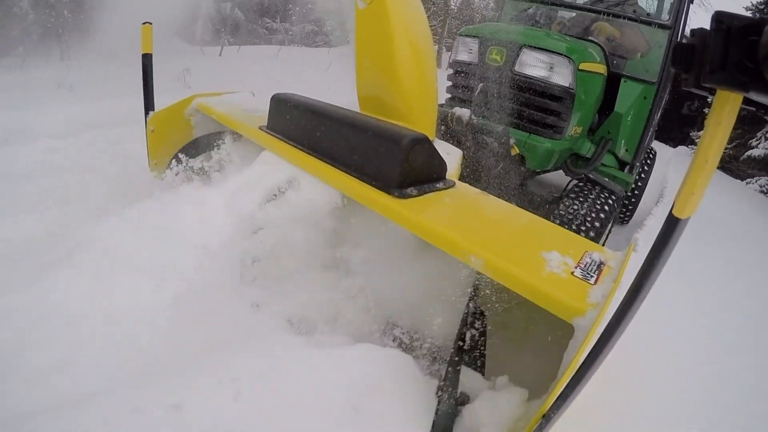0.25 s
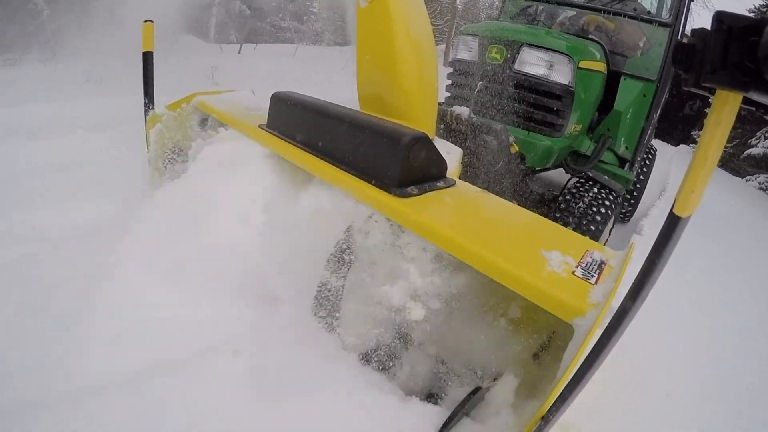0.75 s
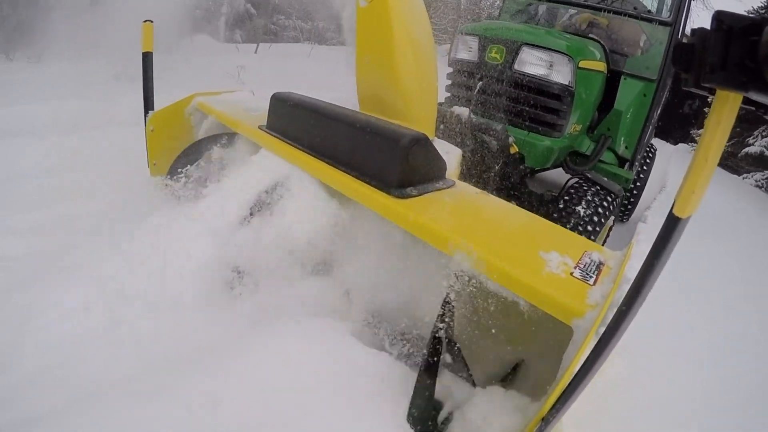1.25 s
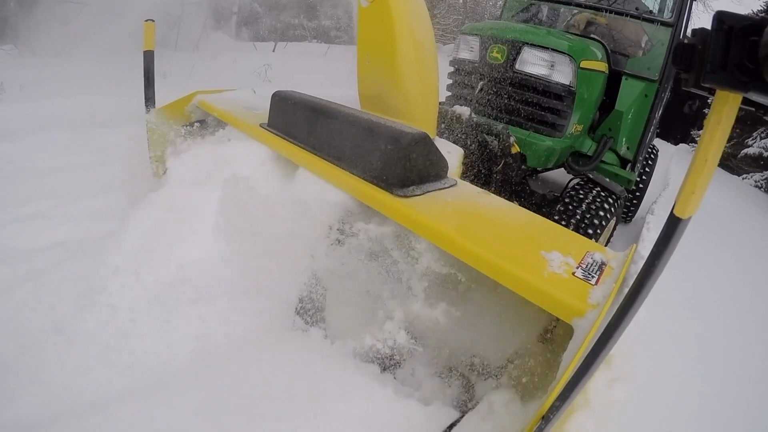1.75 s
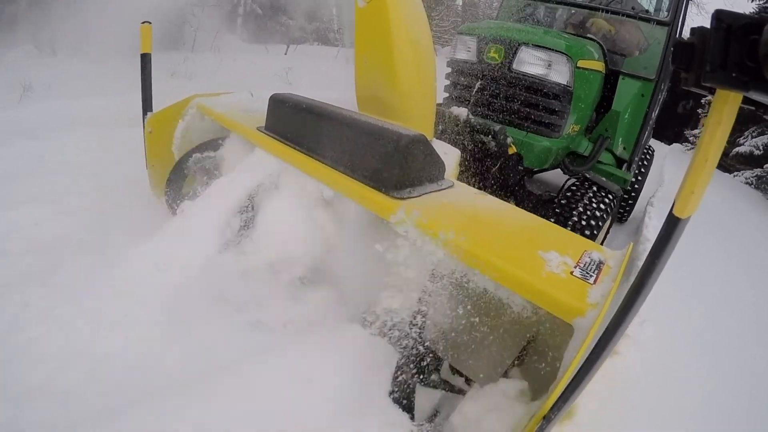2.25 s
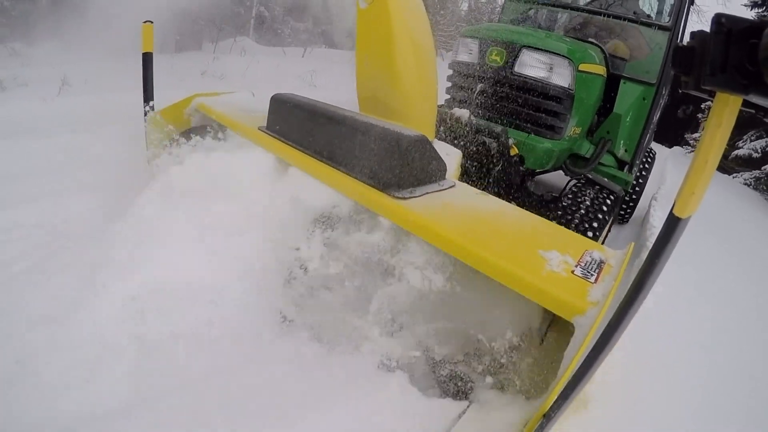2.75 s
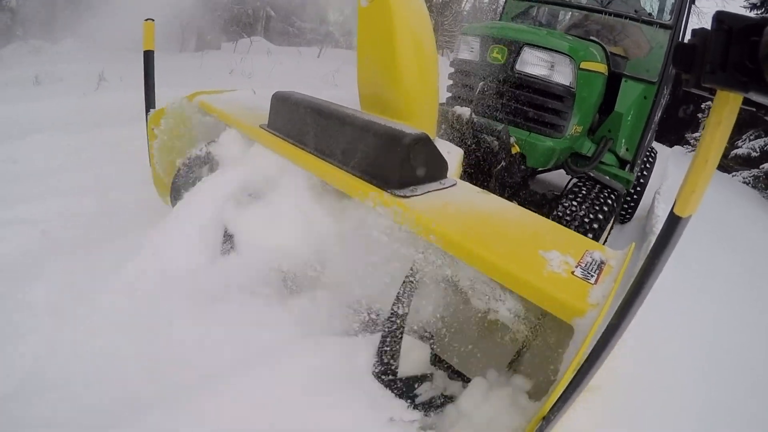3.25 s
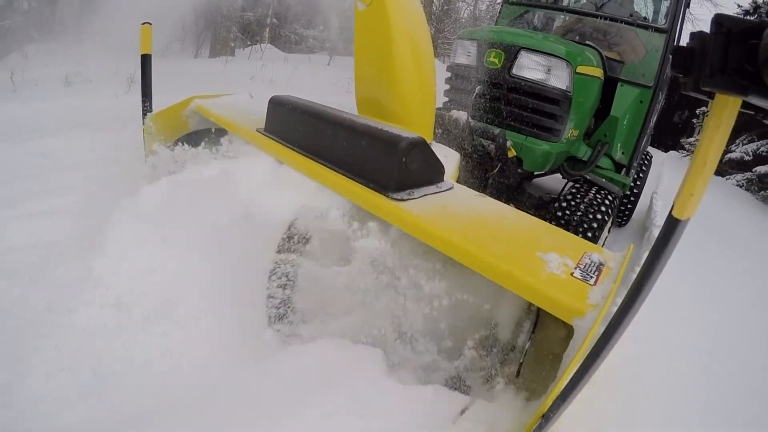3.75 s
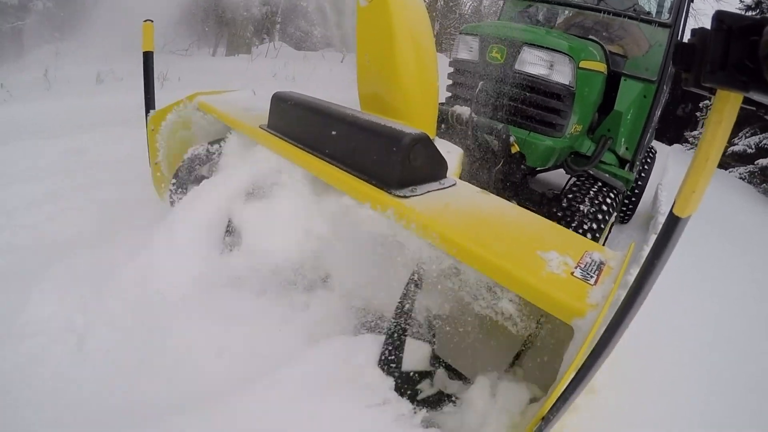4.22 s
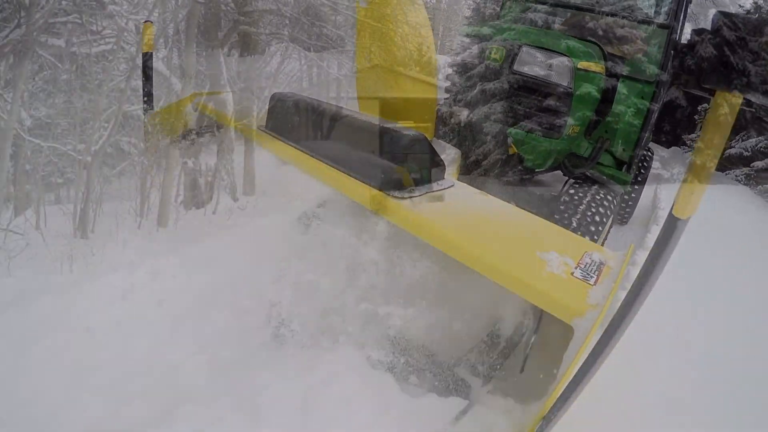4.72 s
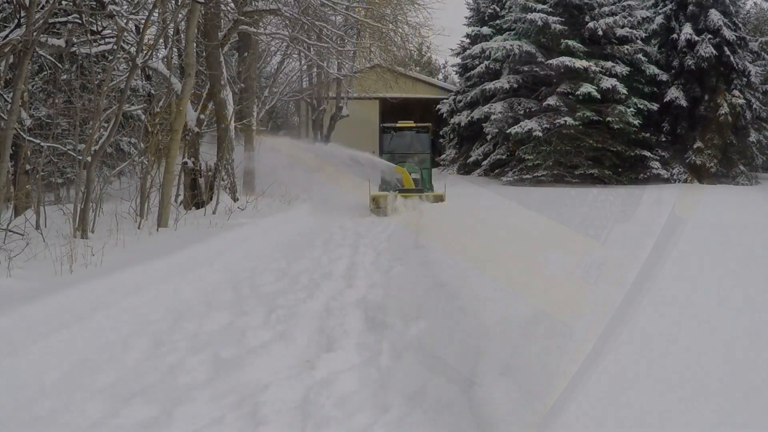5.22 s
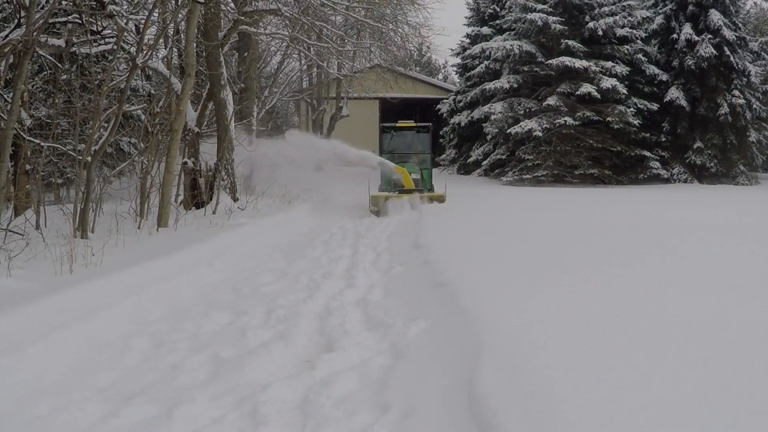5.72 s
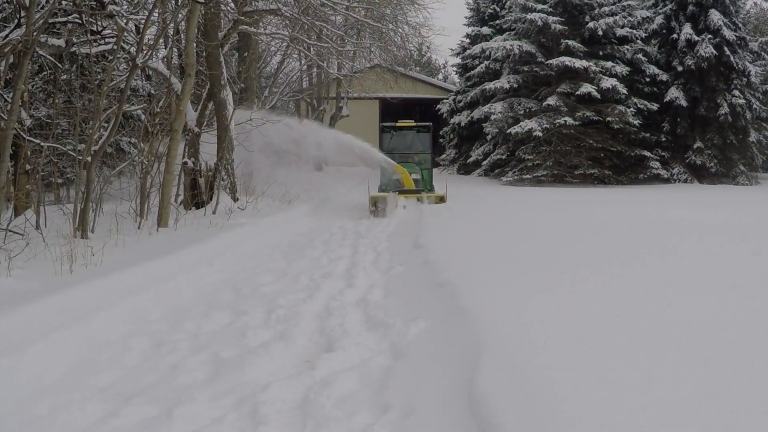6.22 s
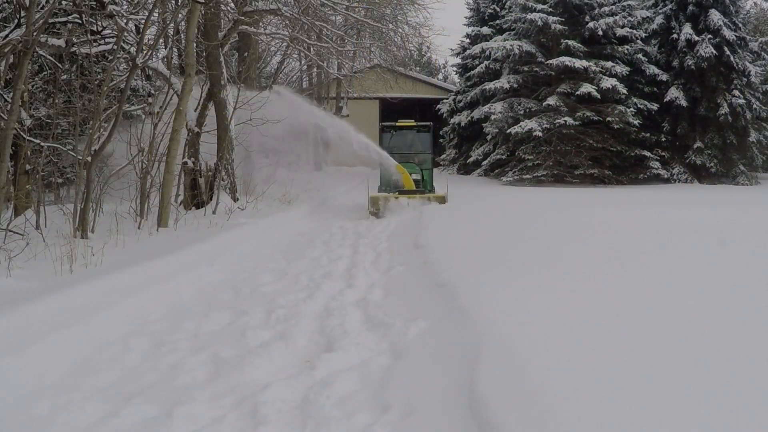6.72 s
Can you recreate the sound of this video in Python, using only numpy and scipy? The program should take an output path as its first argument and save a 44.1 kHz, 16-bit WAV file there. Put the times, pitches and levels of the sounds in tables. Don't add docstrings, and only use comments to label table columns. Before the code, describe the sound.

A diesel tractor's snow blower throbs and whines loudly at close range, then fades into a distant dull drone with soft snow thuds.

```python
import sys
import numpy as np
from scipy import signal
from scipy.fft import rfft, irfft, next_fast_len
from scipy.io import wavfile
from scipy.ndimage import uniform_filter1d

SR = 44100
rng = np.random.default_rng(int(sys.argv[2]) if len(sys.argv) > 2 else 0)


def attenuation_scalar(level_db):
    decades = np.asarray(level_db, float) / 20
    return 10 ** decades


def unload_wav(signal):
    wavfile.write(
        sys.argv[1],
        SR,
        np.round(np.clip(np.atleast_2d(signal).T, -1, 1) * 32767).astype(np.int16),
    )


N = 307377
TIME_S = np.arange(N) / SR
TURN_RAD = 2 * np.pi
BLADES = 3
CYCLES_PER_SHAFT_TURN = 1.6734
FADE_START_S, FADE_S = 4.325, 0.97


def evened(x):
    return x / np.sqrt(np.mean(x ** 2) + 1e-20)


def drift(seconds):
    size = max(round(seconds * SR), 2)
    smooth = uniform_filter1d(rng.standard_normal(N), size)
    return evened(uniform_filter1d(smooth, size))


def shaft_angle(run, order, pulse_s):
    run_s, whine_hz = np.transpose(run)
    shaft_hz = np.interp(TIME_S, run_s, whine_hz) / order
    angle = TURN_RAD * np.cumsum(shaft_hz) / SR
    return angle - angle[round(pulse_s * SR)]


def far_share():
    return np.clip((TIME_S - FADE_START_S) / FADE_S, 0, 1)


def thump(shaft, harmonics, swells, auger):
    bite_s, auger_hz, slip_rad, snap_s = auger
    turn = (TIME_S - bite_s) * auger_hz
    size = round(snap_s * SR)
    out = np.zeros(N)
    for (k, db, rad, snap_turn), (once, twice, peak_turn) in zip(harmonics, swells):
        lag = slip_rad * (0.5 - (turn - snap_turn) % 1)
        from_peak = TURN_RAD * (turn - peak_turn)
        swell = 1 + once * np.cos(from_peak) + twice * np.cos(2 * from_peak)
        slide = uniform_filter1d(np.cos(k * lag), size) + 1j * uniform_filter1d(np.sin(k * lag), size)
        carrier = np.exp(1j * (BLADES * k * shaft + rad))
        out += np.sqrt(2) * attenuation_scalar(db) * swell * (slide * carrier).real
    return out


def bite_of_blades(shaft, uneven_db):
    blade = np.floor(BLADES * shaft / TURN_RAD + 0.5).astype(int)
    size_db = uneven_db * rng.standard_normal(1000)[blade % 1000]
    return attenuation_scalar(uniform_filter1d(size_db, size=250))


# (time [s], level [dB], dying time [s])
WADS = [
    (5.0, -21, .02),
    (5.325, -21, .012),
    (5.62, -17, 0.012),
    (5.915, -18, 0.084),
    (6.272, -18, .012),
    (6.57, -15, 0.07),
    (6.865, -20, 0.011),
    (6.925, -18, .012),
]


def wads(shaft, rise_s, sharp):
    load = np.zeros(N)
    for s, db, fall_s in WADS:
        from_wad_s = TIME_S - s
        load += attenuation_scalar(db) * np.exp(np.where(from_wad_s < 0, from_wad_s / rise_s, -from_wad_s / fall_s))
    half_blade = BLADES * shaft / 2 - 0.35
    u = sharp * np.sin(half_blade)
    pulses = -2.3 * load * u * np.sign(np.cos(half_blade)) * np.exp(-u ** 2)
    chute = signal.butter(2, [75, 175], "band", fs=SR, output="sos")
    return signal.sosfiltfilt(chute, pulses)


def orders(shaft, table, waver_db, lag_rad=0):
    out = np.zeros(N)
    for k, db in table:
        out += np.sqrt(2) * attenuation_scalar(db + waver_db * drift(0.12)) * np.cos(k * shaft - lag_rad)
    return out


def gear(shaft, auger):
    bite_s, auger_hz = auger[:2]
    twist_rad = 0.82 * np.sin(TURN_RAD * auger_hz * (TIME_S - bite_s))
    return orders(shaft + twist_rad / 40, [(40, -24)], waver_db=1.0)


def engine(shaft, table, waver_db, lead_rad=0):
    return orders(CYCLES_PER_SHAFT_TURN * shaft - lead_rad, table, waver_db)


def whines(table):
    out = np.zeros(N)
    for hz, width_hz, db in table:
        level = np.sqrt(2) * attenuation_scalar(db + 2.7 * drift(0.058))
        turns = np.cumsum(hz + width_hz * drift(0.0591)) / SR
        out += level * np.cos(TURN_RAD * turns)
    return out


def roar(shaft, spectrum, panels, dead, knock, slap, patchy_db):
    firing_turn = 3 * CYCLES_PER_SHAFT_TURN * shaft / TURN_RAD % 1
    blade_turn = BLADES * shaft / TURN_RAD % 1
    firing = np.exp(-firing_turn / 0.22) * attenuation_scalar(3.0 * drift(0.013))
    blades = np.exp(-blade_turn / 0.25) * attenuation_scalar(2.5 * drift(0.028))
    drive = rng.standard_normal(N) * (1 + knock * firing + slap * blades)
    drive *= 1 + 0.037 * np.cos(TURN_RAD * 12 * TIME_S)

    z = signal.stft(drive, nperseg=512, noverlap=384)[2]
    patches = uniform_filter1d(rng.standard_normal(z.shape), size=5, axis=0)
    patches = evened(uniform_filter1d(patches, size=7, axis=1))
    drive = signal.istft(z * attenuation_scalar(patchy_db * patches), nperseg=512, noverlap=384)[1][:N]

    size = next_fast_len(N)
    hz = np.fft.rfftfreq(size, 1 / SR) + 1
    at_hz, db = np.transpose(spectrum)
    power = attenuation_scalar(np.interp(np.log(hz), np.log(at_hz), db, left=-40)) ** 2
    for f, width_hz, panel_db in panels:
        power += attenuation_scalar(panel_db) ** 2 / (1 + (2 * (hz - f) / width_hz) ** 4)
    for f, width_hz, depth in dead:
        power *= 1 - min(depth, 0.95) / (1 + (2 * (hz - f) / width_hz) ** 2)
    return evened(irfft(rfft(drive, size) * np.sqrt(power), size)[:N])


# (time [s], gear whine = 40 x shaft [Hz])
NEAR_SPEED = [(0.0, 668.3), (1.09, 663.1), (2.06, 664.6), (2.14, 664.3), (5.15, 669.1)]
# (harmonic, level [dB], lag [rad], snap [turns])
NEAR_BLADES = [(1, -16.5, -0.42, -0.22), (2, -22, -0.72, 0.086), (3, -31, -1.6, 0.088)]
NEAR_SWELLS = [(0.37, 0.1, 0.062), (0.27, 0.37, 0.54), (0.06, 0.16, 0.58)]
# (bite time [s], speed [turns/s], blade slip [rad/turn], snap-back time [s])
NEAR_BITE = (0.303, 3.1, 1.52, 0.053)
# (order, level [dB])
NEAR_SHAFT = [(2, -36), (4, -40), (12, -34), (15, -30), (18, -31.5), (20, -38.5), (21, -32), (24, -35),
              (27, -37), (30, -37.5), (33, -38.5), (36, -40.5)]
# (order, level [dB])
NEAR_CYCLE = [(1, -47), (2, -35), (3, -24), (6, -35.5), (9, -35), (12, -50), (27, -34.5)]
# (frequency [Hz], width [Hz], level
# [dB])
NEAR_TONES = [(700.5, 2, -29), (775, 10, -35), (530, 15, -35), (1329, 6, -42)]
# (frequency [Hz], density [dB/Hz])
NEAR_NOISE = [(22, -10), (70, 1.5), (480, -3.5), (780, -4), (1050, -14), (1400, -8), (1850, -20.5),
              (3000, -14), (3400, -20.5), (5400, -26.5), (7000, -40.5), (9000, -46.5), (13800, -44),
              (15300, -49)]
# (frequency [Hz], width [Hz], density [dB/Hz])
NEAR_STEEL = [(634, 200, -3.5), (945, 105, -3.5), (1181, 78, 0.5), (1683, 89, -15.5), (2059, 98, -3.5),
              (2389, 157, -2), (2572, 200, -10), (2860, 190, -23), (3050, 100, -15), (3750, 21, -21),
              (3890, 46, -20.5), (4674, 290, -23), (5766, 200, -24.5)]
# (frequency [Hz], width [Hz], depth [0-1])
NEAR_GAPS = [(827, 45, 0.4), (1040, 64, 0.55), (1436, 30, 1), (2146, 59, 0.07), (2690, 70, 0.4),
             (2960, 55, .5), (3150, 91, 0.9)]


def near():
    shaft = shaft_angle(NEAR_SPEED, order=40, pulse_s=2.591)
    blower = thump(shaft, NEAR_BLADES, NEAR_SWELLS, NEAR_BITE) * bite_of_blades(shaft, uneven_db=1.5)
    steady = orders(shaft + 0.075, NEAR_SHAFT, waver_db=0.5, lag_rad=1.9)
    blower += steady * bite_of_blades(shaft, uneven_db=2.8)
    motor = engine(shaft, NEAR_CYCLE, waver_db=3.0, lead_rad=0.04)
    noise = attenuation_scalar(-16.5) * roar(shaft, NEAR_NOISE, NEAR_STEEL, NEAR_GAPS, knock=0.5, slap=0.25, patchy_db=1.3)
    return (blower + gear(shaft, NEAR_BITE) + motor + whines(NEAR_TONES) + noise) * (1 - far_share())


# (time [s], ninth engine firing multiple = 45.2 x shaft [Hz])
FAR_SPEED = [(5.3, 763), (6.0, 762), (6.97, 760.5)]
# (harmonic, level [dB], lag [rad], snap [turns])
FAR_BLADES = [(1, -34.5, 0.3, .01), (2, -44.5, -1, .01), (3, -42.5, -2.5, .01)]
FAR_SWELLS = [(.05, 0.6, .01), (0.43, 0.22, .01), (.3, 0.22, .01)]
# (bite time [s], speed [turns/s], blade slip [rad/turn], snap-back time [s])
FAR_BITE = (5.93, 2.99, 0.44, 0.062)
# (order, level [dB])
FAR_SHAFT = [(2, -48), (4, -44), (40, -55)]
# (order, level [dB])
FAR_CYCLE = [(2, -62), (3, -39.5), (6, -48), (9, -49), (12, -60.5), (18, -61), (27, -43.5), (28, -52),
             (29, -56)]
# (frequency [Hz], width [Hz], level [dB])
FAR_TONES = [(354, 4.86, -51), (1350, 3.72, -63)]
# (frequency [Hz], density [dB/Hz])
FAR_NOISE = [(22, -16), (100, 4), (210, -4), (350, -0.5), (680, -3), (830, -15), (900, -15.5),
             (1300, -18.5), (1650, -26.5), (2500, -18), (4800, -26.5), (7500, -42.5), (13500, -44),
             (15300, -49)]
# (frequency [Hz], width [Hz], density [dB/Hz])
FAR_STEEL = [(463, 60, -16), (615, 38, 0), (786, 44, -5), (2900, 440, -14.5), (4380, 110, -22),
             (4870, 220, -22), (5400, 90, -30), (6860, 470, -36)]
# (frequency [Hz], width [Hz], depth [0-1])
FAR_GAPS = [(216, 50, 0.53), (436, 30, 0.79), (725, 44, 0.54)]


def far():
    shaft = shaft_angle(FAR_SPEED, order=45.2, pulse_s=6.271)
    blower = thump(shaft, FAR_BLADES, FAR_SWELLS, FAR_BITE) + wads(shaft, rise_s=0.04, sharp=2.24)
    blower *= bite_of_blades(shaft, uneven_db=2.8)
    blower += orders(shaft, FAR_SHAFT, waver_db=-2.0)
    motor = engine(shaft, FAR_CYCLE, waver_db=0.0)
    noise = attenuation_scalar(-33) * roar(shaft, FAR_NOISE, FAR_STEEL, FAR_GAPS, knock=0.22, slap=0.17, patchy_db=1.0)
    approach_db = -3.5 + 0.72 * (TIME_S - FADE_START_S)
    return (blower + motor + whines(FAR_TONES) + noise) * far_share() * attenuation_scalar(approach_db)


# (time [s], peak level [dB])
FLAKES = [
    (6.0703, -41),
    (6.6166, -40),
]


def ticks():
    out = np.zeros(N)
    t = np.arange(300) / SR
    high = signal.butter(4, 7000, "high", fs=SR, output="sos")
    for s, db in FLAKES:
        tap = attenuation_scalar(-60 * t / 0.0004)
        grit = 0.25 * rng.standard_normal(len(t)) * attenuation_scalar(-60 * t / 0.004)
        click = signal.sosfilt(high, tap + grit)
        out[round(s * SR):][:len(t)] += attenuation_scalar(db) * click / abs(click).max()
    return out


def scene():
    return (near() + far() + ticks())[None]


def thin_treble(x, from_hz, thin, uneven_db):
    hz, _, z = signal.stft(x, SR, window="cosine", nperseg=2048, noverlap=1024)
    bands = np.repeat(rng.standard_normal((65, z.shape[1])), 16, axis=0)[:len(hz)]
    uneven = bands + 0.6 * rng.standard_normal(z.shape[1])
    level = abs(z).mean(0)
    bar = thin * (level / level.max()) ** 0.36 * attenuation_scalar(uneven_db * uneven)
    weak = abs(z) < bar * uniform_filter1d(abs(z), size=48, axis=0)
    kept = np.where(weak & (hz[:, None] > from_hz), 0, z)
    return signal.istft(kept, SR, window="cosine", nperseg=2048, noverlap=1024)[1][:N]


def roll_off(x):
    return signal.sosfilt(signal.butter(12, 15320, fs=SR, output="sos"), x)


def record(dry):
    limited = 1.05 * np.tanh(dry[0] / 1.05)
    thinned = thin_treble(limited, from_hz=8200, thin=1.17, uneven_db=2.6)
    return roll_off(thinned[None])


dry = scene()
out = record(dry)
unload_wav(out)
```